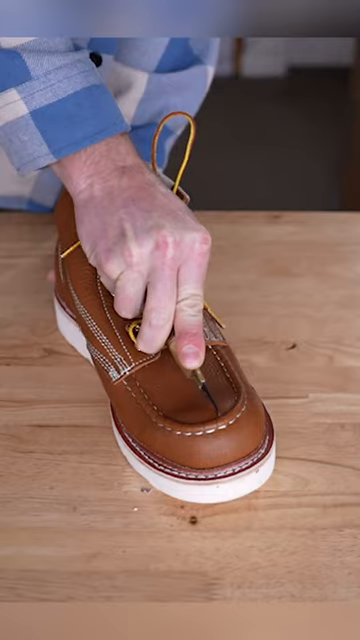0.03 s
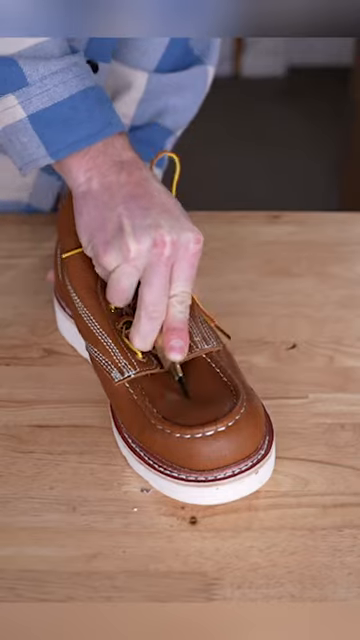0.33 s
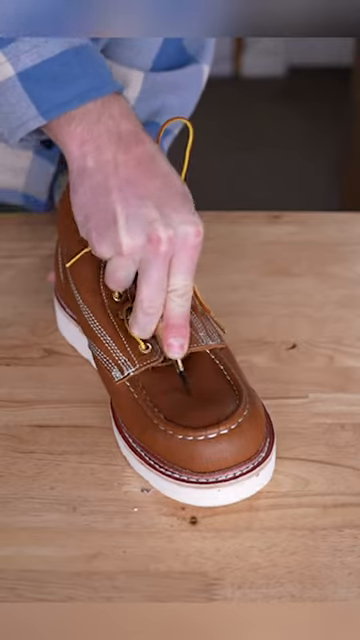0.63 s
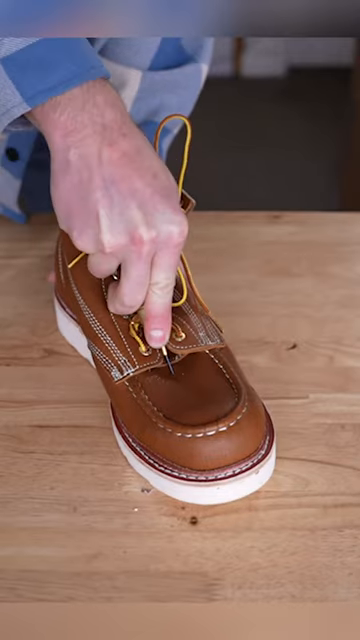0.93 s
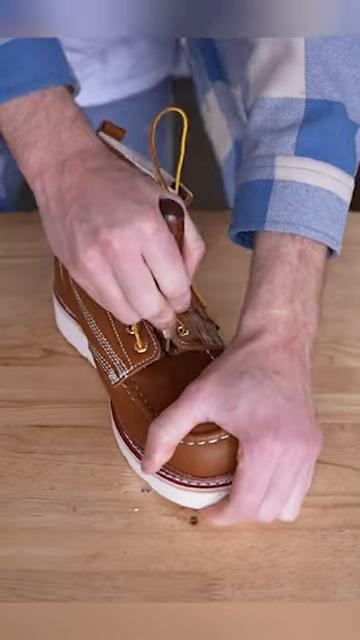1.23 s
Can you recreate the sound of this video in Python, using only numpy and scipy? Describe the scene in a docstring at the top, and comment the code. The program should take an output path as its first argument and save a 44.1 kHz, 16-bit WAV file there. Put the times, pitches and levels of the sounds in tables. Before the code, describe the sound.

Close, uneven scraping of a metal tool on boot leather, with small clicks and dull thumps.

```python
"""Steel tool on a leather boot

Close by in a small room, a steel tool scrapes and slides over a boot on a wooden table. The friction
is a stream of tiny slips; the edge catches in short rasps, the tip ticks, a lace hook pings and the
handle clacks once. The boot knocks on the table, and table and room hum on after each blow."""
import sys
import numpy as np
from scipy import signal
from scipy.fft import rfft, irfft
from scipy.io import wavfile
from scipy.ndimage import uniform_filter1d

SR = 44100
rng = np.random.default_rng(int(sys.argv[2]) if len(sys.argv) > 2 else 0)


def materialize(psi):
    """Save the field psi as 16-bit PCM at rate SR to the path in sys.argv[1].

    A 1-D psi becomes a single channel; in a 2-D psi each row is a channel.
    """
    bounded = np.clip(np.atleast_2d(psi).T, -1, 1)
    quanta = np.round(bounded * 32767).astype(np.int16)
    wavfile.write(sys.argv[1], SR, quanta)


N = 176400
HZ, T = np.fft.rfftfreq(N, 1 / SR), np.arange(N) / SR


def amp(db):
    """Decibels to gain."""
    return 10 ** (np.asarray(db) / 20)


def unit_rms(x):
    """Scales to rms 1."""
    return x / np.sqrt(np.mean(x ** 2) + 1e-20)


def curve_at(points, hz):
    """Reads a curve on a log-frequency axis."""
    freqs, values = np.transpose(points)
    return np.interp(np.log(hz + 1), np.log(freqs + 1), values)


def add(mix, start_s, sound):
    """Mixes a sound in at its start time."""
    part = mix[max(round(start_s * SR), 0):][:len(sound)]
    part += sound[:len(part)]


def equalise(x, eq):
    """Shapes a steady sound with an EQ curve."""
    return irfft(rfft(x) * amp(curve_at(eq, HZ)), N)


def blur(x, steps, axis):
    """Smooths noise along one axis, back to rms 1."""
    size = max(round(steps), 1)
    return unit_rms(uniform_filter1d(uniform_filter1d(x, size, axis), size, axis))


def ring(modes, t):
    """A struck object: one dying sine per mode."""
    return sum(amp(db - 60 * t / t60) * np.sin(2 * np.pi * hz * t) for hz, db, t60 in modes)


def friction(slips_per_s, spread_db, hiss_share):
    """Tiny slips of uneven size over a smooth hiss, in clumps and with shifting resonances."""
    sizes = amp(spread_db * np.minimum(rng.exponential(1, N), 4))
    slips = sizes * rng.choice([-1, 1], N) * (rng.random(N) < slips_per_s / SR)
    texture = (1 - hiss_share) * unit_rms(slips) + hiss_share * rng.standard_normal(N)
    hz, when, spectrum = signal.stft(texture, SR, nperseg=256)
    # Resonances about 550 Hz wide and 36 ms long come and go as the contact moves.
    patches = blur(rng.standard_normal(spectrum.shape), 550 / hz[1], axis=0)
    resonance_db = 3 * blur(patches, 0.036 / when[1], axis=1)
    stick_slip_db = 2.3 * blur(rng.standard_normal(N), 0.0065 * SR, axis=0)
    return signal.istft(spectrum * amp(resonance_db), SR, nperseg=256)[1][:N] * amp(stick_slip_db)


def three_bands(x, eq, crossovers_hz=(800, 5000)):
    """EQs a texture and splits it into low body, mid rasp and high fizz, each at rms 1."""
    spectrum = rfft(equalise(x, eq))
    lows, lows_and_mids = (1 / (1 + (HZ / hz) ** 8) for hz in crossovers_hz)
    shares = (lows, lows_and_mids - lows, 1 - lows_and_mids)
    return [unit_rms(irfft(spectrum * share, N)) for share in shares]


def stroke(envelope, eq, texture):
    """One move of the tool: body, rasp and fizz each swell and fade on their own fader."""
    times, *faders = np.transpose(envelope)
    out, touching = np.zeros(N), (T >= times[0]) & (T <= times[-1])
    for band, fader_db in zip(three_bands(texture, eq), faders):
        out[touching] += band[touching] * amp(np.interp(T[touching], times, fader_db))
    return out


# Room tone EQ: freq_hz, gain_db
AIR_EQ = [(25, -28), (50, 7), (85, 0.5), (200, -6.5), (450, -7), (1000, -18), (2000, -22), (3300, -19),
          (5000, -27), (9000, -31.5), (15500, -31)]
def air(level_db=-50, start_s=0.058):
    """A quiet, dark bed of room air."""
    return amp(level_db) * unit_rms(equalise(rng.standard_normal(N), AIR_EQ)) * (T > start_s)


# Reverb decay: freq_hz, t60_s
ROOM_DECAY = [(150, 0.36), (400, 0.47), (1000, 0.42), (3000, 0.28), (7000, 0.24), (15000, 0.23)]
# Reverb EQ: freq_hz, gain_db
ROOM_EQ = [(80, -16.5), (200, 4.5), (420, -11), (900, -6), (2000, -13), (3300, -6.5), (4600, -9.5),
           (7000, -10), (15000, -19.5)]
# Standing wave: pitch_hz, gain_db, t60_s
ROOM_MODES = [(215, 6, 0.9)]
def room(send):
    """The small room answers with a short diffuse tail and a low standing wave."""
    t = T[:SR]
    hz, when, noise = signal.stft(rng.standard_normal(SR), SR, nperseg=256)
    t60 = curve_at(ROOM_DECAY, hz)[:, None]
    fade = amp(curve_at(ROOM_EQ, hz)[:, None] - 60 * when / t60)
    energy_trim = np.sqrt(2 * np.log(1000) / (t60 * SR))  # longer decays carry no extra energy
    tail = signal.istft(noise * fade * energy_trim, SR, nperseg=256)[1][:SR]
    tail *= np.minimum(t / 0.002, 1)
    for pitch_hz, gain_db, t60_s in ROOM_MODES:
        tail += ring([(pitch_hz, gain_db, t60_s)], t) * 2 * np.log(1000) / (t60_s * SR)
    return signal.fftconvolve(send, tail)[:N]


# Lace hook modes: pitch_hz, gain_db
HOOK_MODES = [(6300, -14), (7000, -15), (7650, -19), (10100, -14), (11500, -18), (12700, -21), (13850, -4),
              (14250, -9)]
# Touches on the hook: start_s, level_db, t60_s
HOOK_PINGS = [(.959, -14, .045), (1.3225, -28, .07), (1.4415, -2, .008)]
def hook_pings():
    """Steel touches a small lace hook, which rings very high and briefly."""
    out, t = np.zeros(N), T[:SR // 8]
    for start_s, level_db, t60_s in HOOK_PINGS:
        modes = [(pitch_hz, gain_db, t60_s) for pitch_hz, gain_db in HOOK_MODES]
        add(out, start_s, amp(level_db) * ring(modes, t))
    return out


# Tool handle modes: pitch_hz, gain_db, t60_s
HANDLE_MODES = [(482, 0, 0.044), (1420, -23, 0.016), (1820, 0.5, .04), (2190, -1.5, 0.038),
                (2510, -3, 0.037)]
def handle_clack(start_s=1.427, level_db=-15.5):
    """The handle's modes ring in one hard, woody clack."""
    out = np.zeros(N)
    add(out, start_s, amp(level_db) * ring(HANDLE_MODES, T[:SR // 8]))
    return out


# Tick EQ: freq_hz, gain_db
TICK_EQ = [(60, -25), (160, -33), (300, -10), (600, 0.5), (1500, -10), (3000, 0), (5000, -3.5), (9000, -6),
           (15500, -7)]
# Ticks of the tip: start_s, crack_db, snap_db
TIP_TICKS = [(0.5529, -28, -31), (0.5931, -30.5, -30), (0.7365, -25, -24), (0.7452, -16, -14.5),
             (0.8624, -22.5, -22), (0.8652, -22.5, -15.5), (1.0209, -12, -18.5), (1.035, -17, -31),
             (1.045, -15.5, -21), (1.0676, -24.5, -28), (1.266, -26, -46), (1.282, -29, -32),
             (1.6606, -55, -31.5), (1.7018, -12.5, -21.5), (1.774, -22, -11), (1.8505, -15, -25),
             (2.3221, -25, -40), (2.542, -19.5, -50), (2.596, -35, -40), (2.728, -36.5, -56),
             (3.032, -27.5, -61), (3.834, -22.5, -27), (3.912, -42, -39)]
def tip_ticks(decay_s=0.00064, crossover_hz=3570):
    """The tip hits the boot: a millisecond of noise, blended from a low crack and a bright snap."""
    out, t = np.zeros(N), T[:SR // 64]
    noise = equalise(rng.standard_normal(N), TICK_EQ)
    lows = irfft(rfft(noise) / (1 + (HZ / crossover_hz) ** 4), N)
    envelope = np.exp(-t / decay_s)
    for start_s, crack_db, snap_db in TIP_TICKS:
        for band, level_db in ((lows, crack_db), (noise - lows, snap_db)):
            burst = band[round(start_s * SR):][:len(t)] * envelope
            burst *= np.linalg.norm(envelope) / np.linalg.norm(burst)
            add(out, start_s, amp(level_db) * burst)
    return out


# Low modes of the wooden table: pitch_hz, gain_db, t60_s
TABLE_MODES = [(80.4, -3, 1), (119.4, 1.5, 0.93), (146, 6, .4), (201.1, -3, 0.97)]
# Knocks on the table: start_s, level_db, pitch_hz, t60_s, hum_db, send_db
BOOT_KNOCKS = [(0.2904, -11.5, 239, 0.052, -50, -6), (.7452, -7.5, 368, 0.022, -66, -1),
               (0.864, -10, 355, 0.028, -66, 2), (0.919, -21, 296, 0.072, -56, -3),
               (0.948, -15.5, 210, 0.076, -57, -4.5), (1.428, -10.5, 233, 0.045, -49, -11),
               (1.7035, 4.5, 393, .012, -66, -1), (1.7345, -12, 380, 0.028, -65, 2),
               (1.7744, -6, 320, 0.011, -66, 4), (1.8385, -7.5, 340, 0.023, -32.5, -3),
               (1.874, -31, 320, .05, -54, -7), (2.0894, -13.5, 207, 0.12, -38.5, -6),
               (2.4001, -10.5, 250, 0.066, -52, -8), (2.52, 2.5, 410, 0.021, -45, 2),
               (2.5416, -2.5, 206.6, .13, -34.5, -7.5), (2.877, -15, 199, 0.11, -52, -15),
               (3.785, -33, 125, 0.084, -41.5, -15)]
def boot_knocks(attack_s=0.0016, low_cut_hz=106):
    """The boot lands with a damped thump and the table hums on. Returns the sound and its room send."""
    out, send, t = np.zeros(N), np.zeros(N), T[:SR]
    attack = 1 - np.exp(-t / attack_s)
    hum = attack * ring(TABLE_MODES, t)
    low_cut = signal.butter(1, low_cut_hz, "high", fs=SR, output="sos")
    for start_s, level_db, pitch_hz, t60_s, hum_db, send_db in BOOT_KNOCKS:
        modes = [(pitch_hz, 0, t60_s), (pitch_hz * 1.666, -14, 0.024)]  # fundamental, short overtone
        thump = signal.sosfilt(low_cut, amp(level_db) * attack * ring(modes, t))
        add(out, start_s, thump + amp(hum_db) * hum)
        add(send, start_s, amp(send_db) * thump)
    return out, send


# Slide EQ: freq_hz, gain_db
SLIDE_EQ = [(70, -44), (160, 0.5), (400, 3), (900, -11.5), (1600, -7.5), (2600, -8), (3400, -6),
            (4600, -18), (7000, -25), (11000, -27.5), (15500, -29)]
# Fader moves, one list per slide: time_s, body_db, rasp_db, fizz_db
SLIDE_ENVELOPES = [
    [(.5, -58, -68, -81), (.55, -55, -63, -73), (.66, -49.5, -49.5, -51.5), (.73, -58, -63, -59)],
    [(1.53, -55, -58, -46), (1.565, -48, -45, -62), (1.6, -56.5, -68, -71), (1.65, -45.5, -47.5, -64),
     (1.7, -40, -45, -68)],
    [(1.78, -36, -44, -53), (1.83, -34, -43, -44.5), (1.87, -25, -47, -50.5), (1.93, -38, -63.5, -61),
     (1.99, -52, -76, -75)],
    [(2.01, -64, -69, -69), (2.05, -50, -51.5, -46.5), (2.08, -62, -54, -57), (2.125, -37, -49.5, -47),
     (2.2, -63, -60, -63)],
    [(2.25, -58, -60, -48), (2.272, -56, -53, -48), (2.285, -55, -37, -34.5), (2.293, -58, -55, -65)],
    [(2.31, -46, -51, -54), (2.38, -46.5, -45, -47), (2.44, -31.5, -42, -45), (2.49, -33, -39.5, -43)],
    [(2.78, -53, -69, -66), (2.83, -58, -50.5, -52.5), (2.9, -53.5, -61, -56.5), (2.94, -53, -53, -52)],
]
def leather_slides():
    """Light rubbing: sparse slips make the leather crinkle."""
    crinkle = friction(slips_per_s=500, spread_db=2.5, hiss_share=0.55)
    return sum(stroke(envelope, SLIDE_EQ, crinkle) for envelope in SLIDE_ENVELOPES)


# Rasp EQ: freq_hz, gain_db
RASP_EQ = [(60, -37), (140, -6.5), (300, 0), (520, 2.5), (950, -12), (1500, -2.5), (2400, -10.5),
           (3400, -6.5), (4200, -12.5), (6300, -21.5), (12900, -23.5), (15800, -24.5)]
# Catches of the edge: start_s, length_s, body_db, rasp_db, fizz_db
EDGE_RASPS = [(.308, 0.015, -31, -22, -27), (1.4249, 0.012, -19, -24.5, -24.5),
              (1.835, .013, -18.5, -26, -31.5), (2.3901, 0.019, -22.5, -35.5, -31),
              (2.4137, 0.0031, -28, -20, -22), (2.452, .006, -29, -28, -29.5),
              (2.461, 0.0063, -28.5, -26, -24), (2.4918, 0.011, -15, -16.5, -21.5),
              (2.504, 0.014, -28, -30, -27.5), (3.779, 0.021, -38, -26, -27)]
def edge_rasps(attack_s=0.0018, release_s=0.0018):
    """The edge catches and tears free in abrupt bursts of dense friction."""
    out, t = np.zeros(N), T[:SR // 16]
    grit = friction(slips_per_s=3000, spread_db=4, hiss_share=0.56)
    bands = np.array(three_bands(grit, RASP_EQ))
    for start_s, length_s, *bands_db in EDGE_RASPS:
        envelope = np.minimum(t / attack_s, 1) * np.exp(-np.maximum(t - length_s, 0) / release_s)
        blend = amp(bands_db) @ bands[:, round(start_s * SR):][:, :len(t)]
        add(out, start_s, envelope * blend)
    return out


# EQ, one list per scrape: freq_hz, gain_db
SCRAPE_EQS = [
    [(41, -49), (70, -28.5), (320, -5.5), (460, -3), (631, -15.5), (1360, -14), (1640, -24), (2950, -14),
     (4150, -19.5), (10300, -23), (15800, -31.5)],
    [(53, -63), (90, -42), (127, -16), (289, 0), (383, -6.5), (1130, -18.5), (1940, -20), (3190, -15.5),
     (6650, -39.5), (13000, -41.5), (14200, -46), (15800, -51)],
    [(71, -45), (120, -9), (522, -1), (602, -16.5), (1420, -18), (1640, -13), (2410, -19.5), (3150, -22.5),
     (15800, -40)],
    [(88, -57), (150, -14.5), (205, -15), (269, -19), (492, -1), (993, -15), (1120, -15.5), (1360, -10),
     (2340, -8), (3320, -8), (5000, -30), (13500, -40.5), (15800, -41.5)],
    [(41, -52), (70, -18.5), (123, -14.5), (162, -26), (203, -4.5), (358, -7), (470, -3), (691, -6),
     (848, -16.5), (2580, -5.5), (10500, -25), (14400, -21.5), (15800, -32)],
]
# Grit, one row per scrape: slips_per_s, spread_db, hiss_share (0-1)
SCRAPE_GRIT = [(3040, 3.5, 0.45), (2165, 3, 0.31), (700, 3.5, 0.36), (3680, 1, 0.75), (2940, 2.5, 0.61)]
# Fader moves, one list per scrape: time_s, body_db, rasp_db, fizz_db
SCRAPE_ENVELOPES = [
    [(0.2, -66, -62, -83), (0.214, -45.5, -50.5, -51.5), (0.246, -38, -44.5, -54), (0.268, -31, -32, -28.5),
     (0.284, -18.5, -27, -29.5), (0.3, -21, -25.5, -18.5), (0.32, -27, -16, -17.5), (0.344, -32, -42, -51),
     (0.36, -28, -35.5, -46)],
    [(0.89, -41, -49, -50), (0.916, -21, -17, -24.5), (0.952, -18.5, -25, -29), (0.96, -28, -22.5, -30),
     (0.976, -26.5, -28, -36.5), (1.042, -28.5, -32, -37.5), (1.06, -34, -52, -81), (1.066, -45, -64, -50),
     (1.09, -52, -55, -65)],
    [(1.24, -59, -54, -66), (1.282, -36, -42.5, -48), (1.308, -32, -41, -52.5), (1.322, -40, -42.5, -43.5),
     (1.38, -42, -57, -70)],
    [(2.95, -58, -59, -59), (3.016, -67, -53, -61), (3.028, -54.5, -45, -60), (3.122, -39, -41.5, -60),
     (3.136, -33, -30, -50), (3.168, -28.5, -25.5, -43.5), (3.232, -27.5, -23, -41.5),
     (3.344, -47, -44, -49), (3.43, -89, -67, -68)],
    [(3.48, -69, -102, -89), (3.496, -48, -45.5, -62), (3.538, -55, -39.5, -62), (3.55, -47, -33.5, -48.5),
     (3.604, -33.5, -27, -41.5), (3.634, -35, -30.5, -46.5), (3.694, -34.5, -29.5, -36.5),
     (3.724, -34.5, -26, -30), (3.8, -25.5, -24, -21), (3.812, -23.5, -55, -56), (3.84, -36.5, -52, -66),
     (3.88, -77, -75, -77)],
]
def tool_scrapes():
    """Steel drags over leather, each stroke with its own grit and tone."""
    scrapes = zip(SCRAPE_ENVELOPES, SCRAPE_EQS, SCRAPE_GRIT)
    return sum(stroke(envelope, eq, friction(*grit)) for envelope, eq, grit in scrapes)


def scene():
    """Tool and boot in the room, over quiet air, in mono."""
    tool = tool_scrapes() + leather_slides() + edge_rasps() + tip_ticks() + hook_pings()
    clack = handle_clack()
    knocks, knock_send = boot_knocks()
    room_send = tool + knock_send + amp(-2) * clack
    return (air() + room(room_send) + knocks + clack + tool)[None]


def record(dry, low_cut_hz=87, ceiling=0.55, high_cut_hz=15900):
    """Master chain: low cut, soft clip to round the peaks, high cut."""
    low_cut = signal.butter(4, low_cut_hz, "high", fs=SR, output="sos")
    high_cut = signal.firwin(301, high_cut_hz, window=("kaiser", 8), fs=SR)
    trimmed = signal.sosfilt(low_cut, dry)
    rounded = trimmed / (1 + (trimmed / ceiling) ** 6) ** (1 / 6)
    return signal.oaconvolve(rounded, high_cut[None], "same")


dry = scene()
out = record(dry)
materialize(out)
```